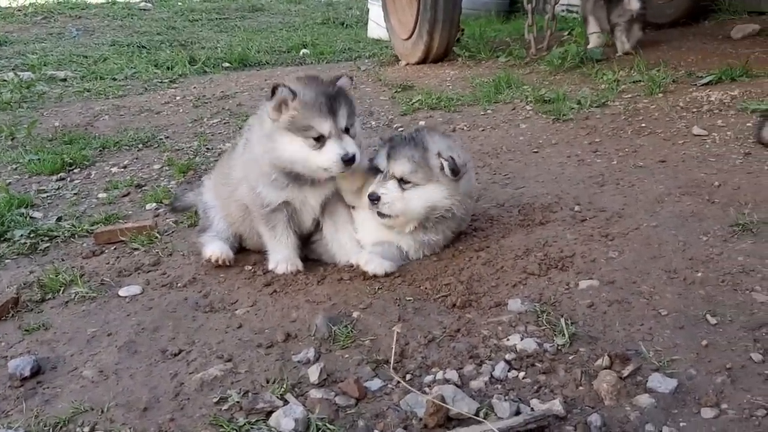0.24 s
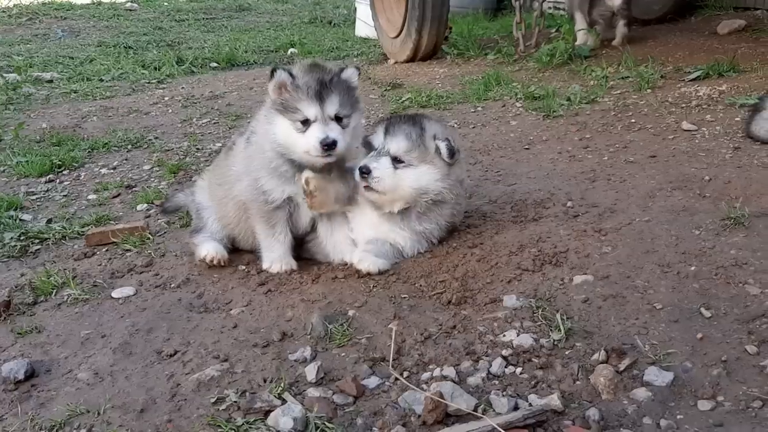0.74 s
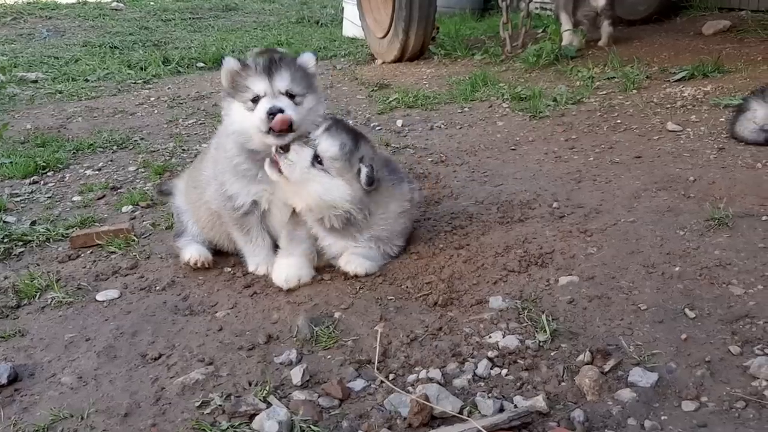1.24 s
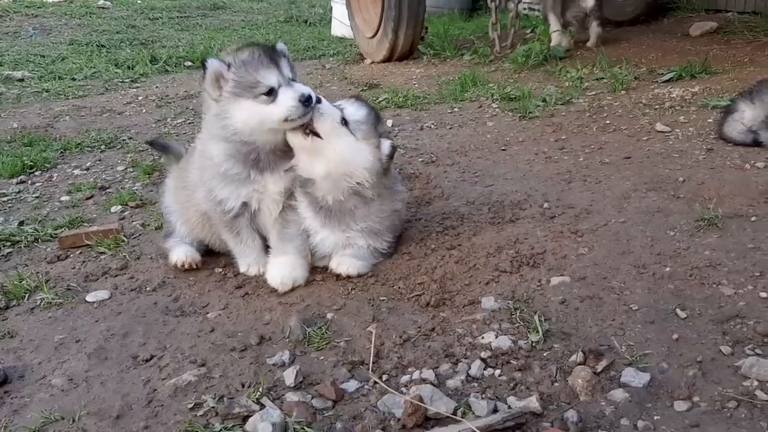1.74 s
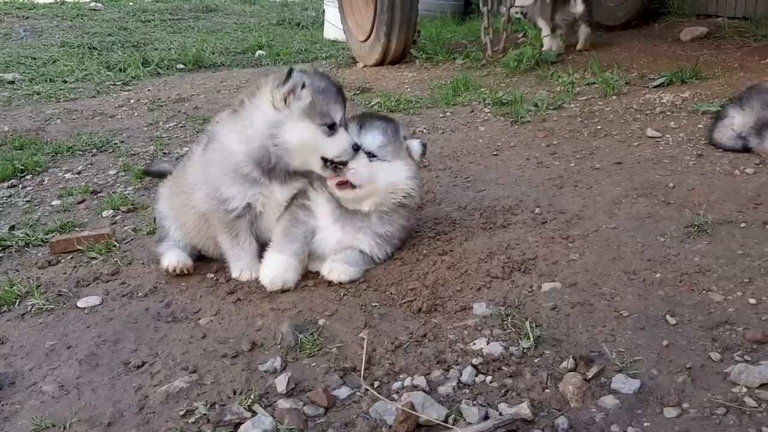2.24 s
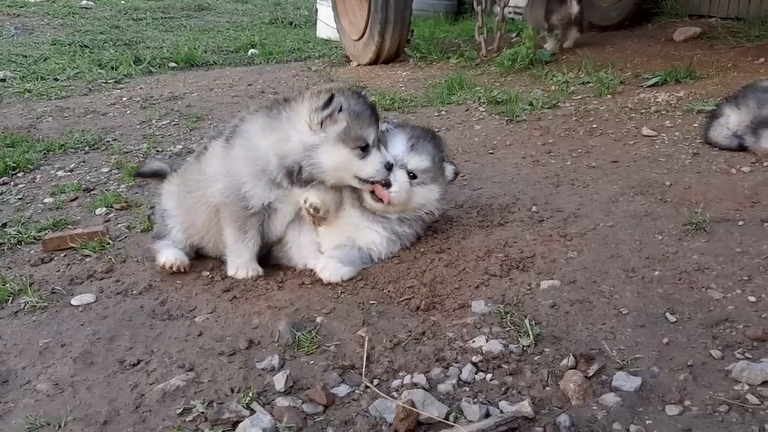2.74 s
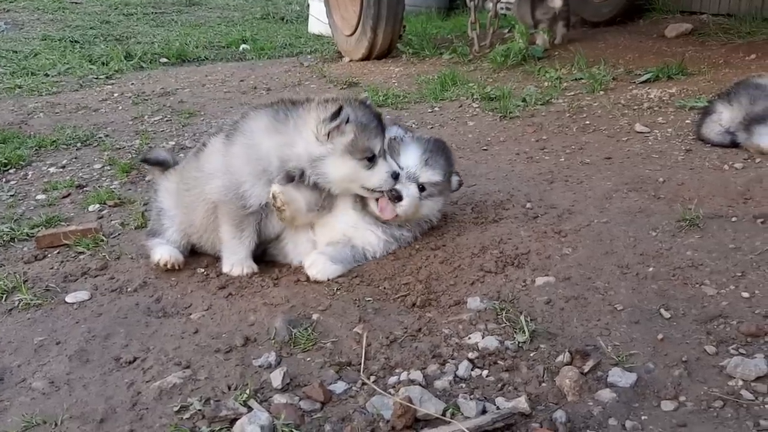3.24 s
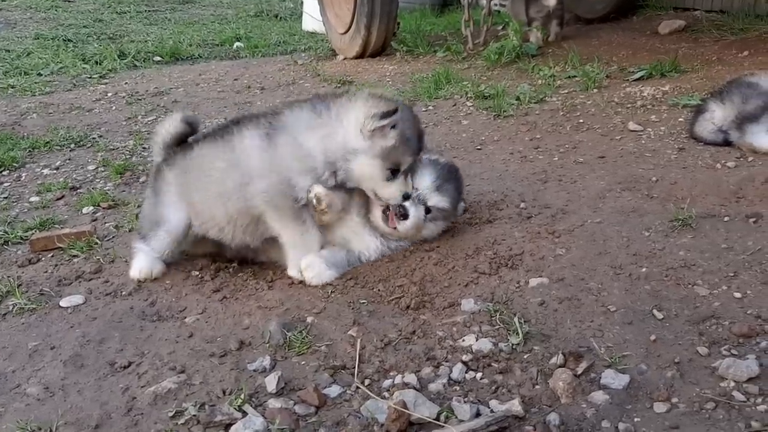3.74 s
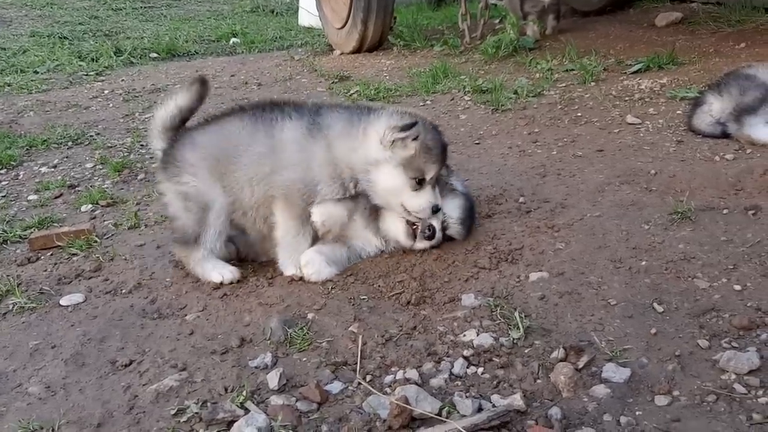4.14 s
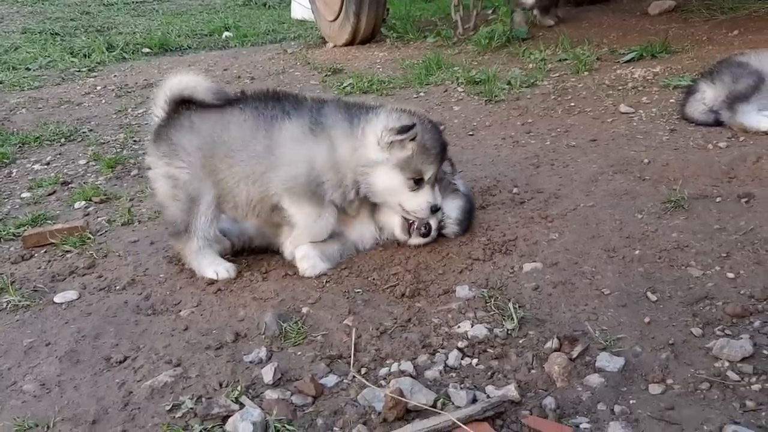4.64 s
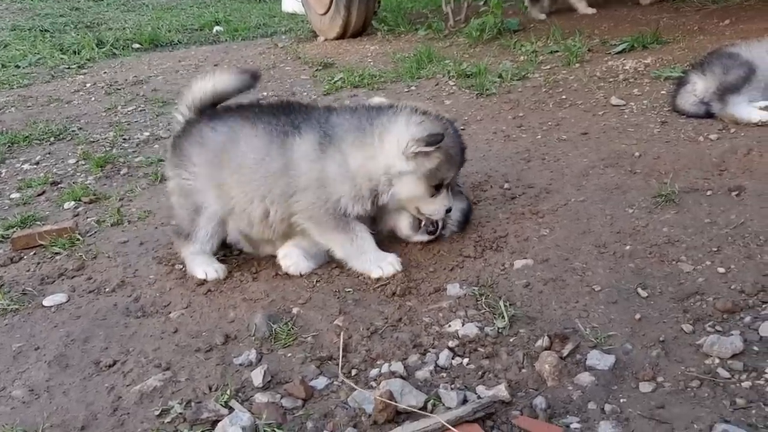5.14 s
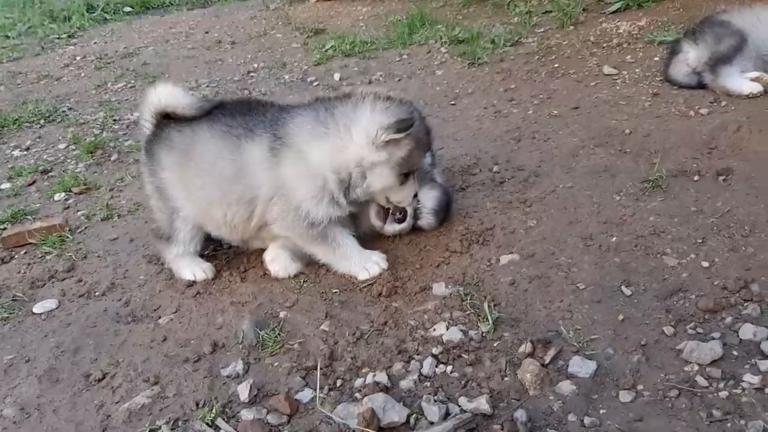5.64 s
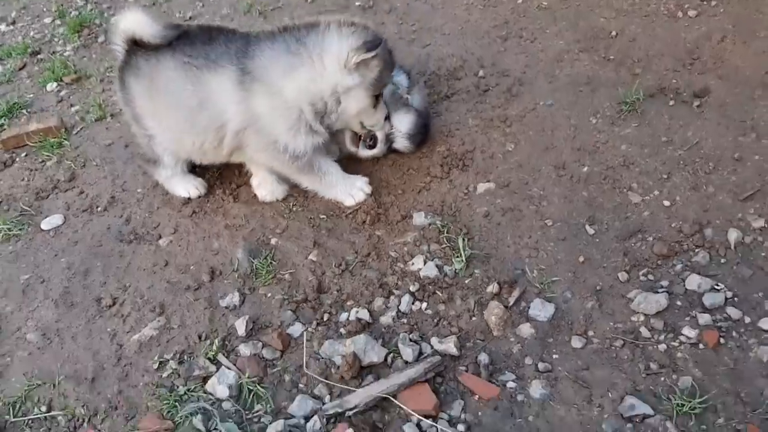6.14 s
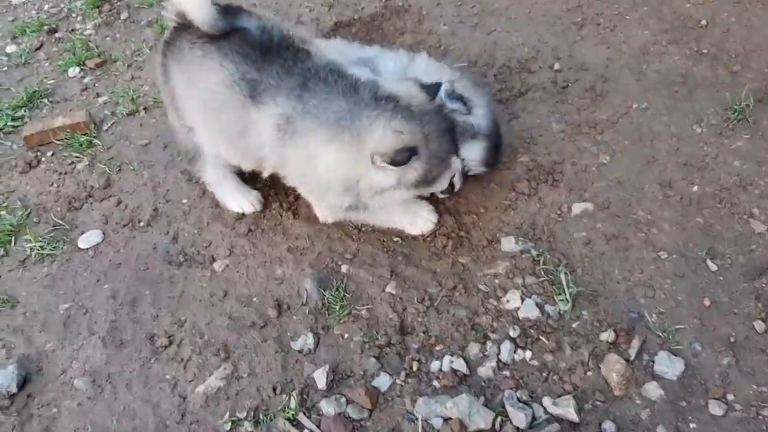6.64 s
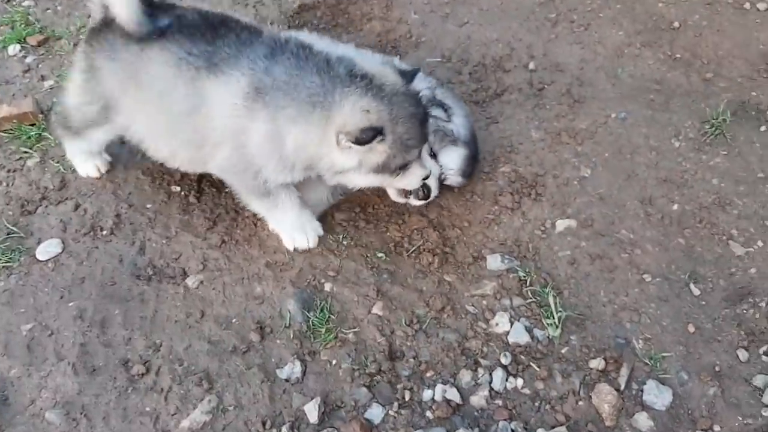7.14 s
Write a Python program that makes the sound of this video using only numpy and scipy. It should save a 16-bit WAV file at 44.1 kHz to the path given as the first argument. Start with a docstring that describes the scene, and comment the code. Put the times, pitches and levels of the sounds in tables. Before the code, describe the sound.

Outdoors, quiet wet puppy smacks and soft scuffling give way to four long, piercing puppy whines amid fur rubbing and gritty dirt.

```python
"""Two puppies wrestle on bare earth in a yard, close to a stereo microphone, over open air (shaped noise).
Wet smacks (ringing ticks) and soft whimpers (arched near-pure tones) open it; noise rubs as fur and dirt.
A body rolls dully, then the pinned puppy whines in four long, high calls (gliding harmonics and breath).
The one on top grumbles (pulsed noise) just before and during the first two; echoes are faint and sparse.
Grit cracks from the middle on, and low bumps (short sines and noise) reach the microphone near the end."""
import sys
import numpy as np
from scipy import signal
from scipy.fft import rfft, irfft, next_fast_len
from scipy.io import wavfile

SR = 44100
rng = np.random.default_rng(int(sys.argv[2]) if len(sys.argv) > 2 else 0)


def file_out(sig):
    """Save sig as 16-bit WAV at sys.argv[1]."""
    # one column per channel
    cols = np.atleast_2d(sig).T
    # limit, then scale
    lim = np.clip(cols, -1, 1)
    pcm = np.round(lim * 32767).astype(np.int16)
    wavfile.write(sys.argv[1], SR, pcm)


N = 325458
TIME = np.arange(N) / SR

# pitch of each whine: t/s, f/Hz
PITCH_1 = [(3.65, 1315), (3.67, 1296), (3.694, 1381), (3.806, 1385), (3.828, 1412), (3.96, 1401),
           (3.992, 1337), (4.044, 1427), (4.062, 1398)]
PITCH_2 = [(4.252, 1235), (4.29, 1335), (4.335, 1378), (4.5, 1342), (4.52, 1357), (4.745, 1320),
           (4.764, 1265), (4.8, 1283), (4.88, 1188), (4.924, 1182), (4.954, 1249), (4.985, 1242),
           (5.045, 1165), (5.15, 1121), (5.35, 1138), (5.496, 1246), (5.562, 1232), (5.602, 1302),
           (5.645, 1306)]
PITCH_3 = [(5.842, 1115), (5.872, 1123), (5.9, 1290), (5.926, 1348), (5.955, 1334), (5.998, 1355),
           (6.038, 1412), (6.065, 1404), (6.12, 1300), (6.214, 1256), (6.3, 1290), (6.63, 1280),
           (6.705, 1318), (6.735, 1298)]
PITCH_4 = [(6.94, 1002), (6.982, 1160), (7.018, 1264), (7.043, 1240), (7.093, 1286), (7.104, 1328),
           (7.154, 1369), (7.25, 1270), (7.376, 1240)]
# strength of each whine as the jaw moves, before trims:
# t/s, fundamental level/dB, 2nd harmonic level/dB, 3rd level/dB, 4th level/dB, higher overtones level/dB
VOICE_1 = [(3.665, -39, -65, -71, -73, -76), (3.733, -36, -61.5, -46, -66, -64),
           (3.841, -29.5, -59, -54.5, -44, -49), (3.933, -21.5, -47.5, -45.5, -68, -52),
           (4.013, -25.5, -38, -33.5, -48.5, -43), (4.075, -22, -75, -54, -68, -44)]
VOICE_2 = [(4.265, -26.5, -63, -74, -72, -67), (4.315, -35, -53.5, -54, -64, -60.5),
           (4.515, -28.5, -62.5, -67, -64, -59.5), (4.559, -36.5, -62, -61, -66, -61),
           (4.675, -31, -72, -65, -65, -58.5), (4.795, -15, -41, -34, -70, -48.5),
           (4.821, -22.5, -22.5, -21, -45.5, -43.5), (4.919, -27.5, -15, -28, -49, -48.5),
           (4.953, -19, -35, -24.5, -51, -49), (5.061, -22.5, -31.5, -53.5, -50.5, -52),
           (5.177, -29.5, -35.5, -51.5, -60, -53.5), (5.251, -25.5, -23.5, -49.5, -37.5, -55),
           (5.329, -24, -27.5, -51.5, -31.5, -54.5), (5.417, -19, -26.5, -48, -42.5, -53.5),
           (5.449, -16, -33, -29, -38.5, -48), (5.589, -20, -35.5, -22.5, -32, -46),
           (5.631, -24, -33, -49, -44, -49), (5.655, -17, -41, -40.5, -47, -41.5)]
VOICE_3 = [(5.855, -27, -46, -57, -46.5, -63), (5.889, -29, -32.5, -22, -32.5, -48),
           (6.045, -19, -34, -21.5, -36.5, -51.5), (6.117, -21.5, -47, -38.5, -44, -48),
           (6.225, -39, -46.5, -33, -49, -49), (6.301, -22.5, -39.5, -33, -35, -52),
           (6.427, -28, -28, -45, -45.5, -55), (6.499, -22, -31, -35, -34.5, -57.5),
           (6.551, -19.5, -31, -44.5, -37, -52), (6.657, -16.5, -32.5, -37, -34.5, -46),
           (6.725, -18.5, -42, -39, -39, -53), (6.745, -20.5, -29, -47, -48, -62)]
VOICE_4 = [(6.943, -35.5, -38, -51, -51, -55), (6.963, -26, -33.5, -25, -45, -47),
           (6.989, -34.5, -32.5, -36.5, -36, -41), (7.067, -29, -37.5, -27.5, -29.5, -40),
           (7.117, -23, -33.5, -22, -29.5, -46), (7.153, -16.5, -41, -21, -36, -57.5),
           (7.265, -24, -40.5, -40, -43, -53), (7.287, -29, -34.5, -33.5, -43, -53.5),
           (7.365, -35, -44, -34, -36.5, -53.5)]
# the four whines: start t/s, end t/s, added roughness at the start, time to clear t/s,
# tilt of the top overtones at the start and at the end [dB per octave]
WHINES = [(3.645, 4.094, 0.4, 0.1, -19, -2.5), (4.253, 5.674, 0.2, 0.18, -17.5, -6.5),
          (5.842, 6.763, .18, 0.07, -18, 15), (6.929, 7.448, 0.43, 0.12, -51.5, -4)]
# the voice cracks and the overtones leap up or down:
# t/s, spread of the roughness t/s, added roughness, leap level/dB before it evens out
CRACKS = [(3.971, 0.0064, 0.87, 19.5), (4.034, 0.015, 0.47, -16.5), (4.752, 0.0056, .35, 15),
          (6.024, 0.0046, 0.1, 8), (6.082, 0.021, 0.2, 2.5), (6.757, 0.014, 0.7, 2),
          (7.103, 0.0077, 0.07, 9.5)]
# where the head's turning puts the fundamental: t/s, left-right level/dB, left lead [rad]
HEAD = [(3.7, 0, 1.5), (3.88, 17, 2.5), (4.02, 2, 1.3), (4.65, -1, 2), (4.75, -0.5, .5), (5.35, 3.5, 0.3),
        (5.52, -.5, 0.8), (6.02, 4.5, 0.4), (6.2, 10, -1.1), (6.7, 4, -0.1), (7.14, 7, 1.06),
        (7.33, 9, -2.5)]
# colour of the high overtones: f/Hz, relative level/dB
OVERTONES = [(5500, 2), (6500, 7), (7400, 12.5), (8600, -6.5), (9800, 14), (11500, 17.5), (13000, 16),
             (14300, 13), (16000, -17)]
# colour of the hoarse breath: f/Hz, relative level/dB per Hz
RASP = [(200, -19), (600, -14.5), (1000, -15), (1400, 10.5), (2300, 13), (3000, -19.5), (3900, 14.5),
        (5200, -38), (6500, -34), (8500, -33.5), (11000, -23), (16000, -29)]
# soft closed-mouth whimpers of either puppy:
# t/s, length t/s, first f/Hz, middle f/Hz, last f/Hz, level/dB before the harmonics' falls, roughness
WHIMPERS = [(0.264, 0.0077, 640, 570, 553, -43.5, 1.3), (0.292, 0.063, 620, 536, 640, -46.5, 0.48),
            (2.629, 0.0453, 894, 822, 775, -44, 0.3), (2.974, 0.067, 658, 578, 663, -34, 0.06),
            (3.301, 0.14, 1060, 1310, 1097, -39, 0.14), (3.45, 0.018, 980, 944, 840, -45, 0.25),
            (4.254, 0.036, 610, 634, 630, -46.5, 0.6), (4.4, 0.086, 630, 706, 636, -57.5, 1.3),
            (4.521, 0.13, 750, 792, 720, -54, 0.5)]
# muffled grumbles of the puppy on top: t/s, length t/s, level/dB, mean pulse rate f/Hz
GRUMBLES = [(3.42, 0.053, -55, 250), (3.803, .1, -53.5, 170), (3.975, 0.2, -57, 75),
            (4.235, 0.093, -51.5, 140), (4.536, 0.084, -53.5, 96)]
# its throat: f/Hz, relative level/dB per Hz
MUZZLE = [(250, -31), (500, -13), (700, -8.5), (1000, -11), (1400, -14), (2000, -3.5), (2600, -15.5),
          (4000, -19.5), (8000, -43)]
# wet smacks of the mouths:
# t/s, onset level/dB before trim, resonance f/Hz, resonance level/dB before a fixed lift, tick t60 t/s
SMACKS = [(0.2105, -31, 4730, 9, 0.021), (0.211, -26.5, 11600, -13.5, 0.025), (.221, -48, 4300, 13, 0.073),
          (0.263, -52, 4130, -11, 0.042), (0.342, -48.5, 4520, -13, 0.012),
          (0.381, -41.5, 2660, -10, 0.046), (0.3904, -26.5, 2650, -12, 0.017),
          (0.398, -36.5, 2750, -2, 0.03), (.541, -52, 2400, 3, 0.035), (0.5475, -30, 2380, -10, 0.045),
          (0.563, -41, 2400, 22, 0.014), (1.504, -56.5, 1490, -13, 0.13), (1.973, -39, 11800, -17.5, 0.032)]
# grit cracking under the paws: same columns as the smacks
GRIT = [(3.2455, -61, 11200, 14, 0.03), (3.6263, -57, 11800, 29, 0.027), (4.326, -42, 1720, 12, 0.017),
        (4.347, -60, 11300, -10, .015), (4.385, -51.5, 11700, 8, 0.044), (5.012, -38.5, 6460, -32, 0.04),
        (5.116, -43.5, 3970, -16, 0.023), (5.78, -44, 1580, -4.5, 0.024), (6.327, -34, 3760, -11, 0.015),
        (6.4752, -27.5, 2570, -1, 0.01), (6.707, -34.5, 6870, -33, 0.012), (6.723, -50, 7400, 8, .015),
        (7.216, -54, 12200, 4, 0.013), (7.253, -51, 12000, 1, 0.02), (7.293, -51, 11200, 8, .02),
        (7.325, -35.5, 12100, -18, 0.0027)]
# the bare tick of either: f/Hz, relative level/dB per Hz
TICK = [(150, 1), (600, -6), (1300, 11.5), (3500, 5.5), (5500, -0.5), (7300, 7.5), (9000, 1), (12000, 2),
        (16000, 5.5)]
# vigour of the tussle, which drives the rubbing fur: t/s, level/dB before trim
TUSSLE = [(0, -72), (2.3, -76), (3.55, -76), (3.72, -62.5), (4.55, -69), (4.9, -60.5), (5.85, -65),
          (7.38, -63.5)]
# single shoves and rolls: middle t/s, half length t/s,
# fur level/dB, loose dirt level/dB, low rumble level/dB, all before trims
SHOVES = [(0.364, 0.077, -64.5, -68, -67), (0.803, 0.026, -87, -69, -62), (1.21, 0.23, -70.5, -69, -63),
          (1.593, 0.046, -72, -67.5, -75), (1.87, 0.081, -68.5, -65.5, -67), (2.018, .05, -78, -63.5, -82),
          (2.47, 0.04, -71.5, -69, -74), (2.715, 0.073, -80, -65, -80), (2.812, 0.038, -67, -66, -57.5),
          (3.192, 0.25, -65, -67.5, -66), (3.416, 0.053, -64.5, -63, -64), (4.008, 0.047, -60, -59, -91),
          (4.35, 0.054, -64, -59, -63), (4.777, .15, -66, -64, -71), (6.43, 0.22, -60, -48, -57.5),
          (6.737, 0.081, -60, -48, -54), (7.084, 0.11, -85, -44, -67)]
# rubbed fur: f/Hz, relative level/dB per Hz
FUR_COLOUR = [(150, -26.5), (400, 1.5), (700, 1.5), (1200, 5.5), (1700, -1.5), (2400, 2), (2750, -6.5),
              (3100, -41), (6000, -44)]
# loose dirt: f/Hz, relative level/dB per Hz
DIRT_COLOUR = [(1500, -17.5), (3200, 7), (4600, 7.5), (6000, 4), (7500, 4), (8600, -19), (11000, 3),
               (14000, -6), (16000, 0)]
# a body rolls heavily on the earth: start t/s, length t/s, level/dB
ROLL = (2.75, 0.27, -58.5)
# its dull colour: f/Hz, relative level/dB per Hz
ROLL_COLOUR = [(100, 2), (230, -5), (340, 0.5), (450, -19), (900, -48)]
# low bumps on the microphone: t/s, level/dB before trim and lean, f/Hz, length t/s
BUMPS = [(6.15, -52, 66.7, 0.046), (6.199, -42.5, 73.6, 0.05), (6.297, -43.5, 240, 0.009),
         (6.369, -44.5, 108, 0.058), (6.438, -49.5, 71, 0.087), (6.561, -54, 68, 0.11),
         (6.709, -32, 292, 0.0021), (6.719, -31.5, 78.5, 0.047), (6.763, -33.5, 121, 0.033),
         (6.775, -37, 77, 0.062), (7.127, -49.5, 70.4, 0.069)]
# echo of the yard: f/Hz, t60 t/s
YARD = [(300, 0.24), (1300, 0.33), (4000, 0.37), (8000, 0.26), (15000, 0.39)]
# the open air: f/Hz, relative level/dB per Hz
AIR = [(25, -8), (50, 1.5), (120, 0.5), (300, -10), (730, -20.5), (1500, -18.5), (2400, -14.5),
       (3200, -33.5), (7500, -43.5), (8600, -49), (11300, -24), (16000, -28.5)]

# every whine swells quickly; at its end the pitch sags, the voice roughens and the sound dies
ATTACK_S, ATTACK_DB = 0.0101, -14.5
SAG_S, SAG_SHARE, SAG_ROUGH, SAG_DB = 0.0269, 0.182, 0.45, -14.5
SAG_OVERTONE_DB = -4  # the top overtones die sooner as the pitch sags
CLEAR_ROUGH = 0.021  # roughness left in the clear voice
# a leap evens out within this time; the fundamental and the top overtones take this share of it
LEAP_S, LEAP_SHARE = 0.033, 0.22
# loose dirt rises more steeply with vigour than fur: its drive when the fur's is CALM_DB, and dB per dB
CALM_DB, DIRT_CALM_DB, DIRT_RISE = -76, -78, 1.5
STROKE_DB = 2.6  # unevenness of the scuffling strokes
RUMBLE_DB, AIR_DB = -71, -64.5  # steady low rumble at the microphone before its swaying; open air
EDGE_HZ = 16100  # upper band limit


def whine(start, end, first_rough, clear_s, first_tilt_db, last_tilt_db, pitch, levels):
    """Tight vocal folds ring near 1.3 kHz; the moving jaw brings out one harmonic after another."""
    t = np.arange(start, end, 1 / SR)
    onset = np.clip(1 - (t - start) / ATTACK_S, 0, 1)
    sag = np.clip(1 - (end - t) / SAG_S, 0, 1)
    hz = curves(pitch, t)[0] * (1 - SAG_SHARE * sag)

    leaps_db = np.outer([LEAP_SHARE, 1, 1, 1, LEAP_SHARE], crack_leap(t))
    *low_db, high_db = curves(levels, t) + ATTACK_DB * onset + SAG_DB * sag ** 2 + leaps_db
    high_db = high_db + SAG_OVERTONE_DB * sag

    rough = CLEAR_ROUGH + first_rough * swell(t, start, clear_s) + SAG_ROUGH * sag
    rough += sum(depth * swell(t, s, length) for s, length, depth, _ in CRACKS)
    jitter = 0.028 * rough * wander(len(t), 210).real + 0.0063 * wander(len(t), 49).real
    turns = np.cumsum(hz * (1 + jitter)) / SR

    left_db, lead = curves(HEAD, t)
    ratio = gain_of(left_db) * np.exp(1j * lead)  # left microphone over right
    left = (ratio - 1) / (ratio + 1)
    voice = partial(turns, gain_of(low_db[0]), rough, shimmer=0.25, spread=0.12, left=left)
    for k, db in enumerate(low_db[1:], 2):
        level = gain_of(db - 0.66 + 2 * wander(len(t), 45).real)
        voice += partial(k * turns, level, rough, shimmer=1.0, spread=0.74, left=0.25)

    tilt_db = np.linspace(first_tilt_db, last_tilt_db, len(t))
    voice += top_overtones(hz, turns, high_db, tilt_db, rough)
    voice += breath(turns, low_db, rough)
    return start, voice * signal.windows.tukey(len(t), 0.003 * SR / len(t))


def crack_leap(t):
    """At a crack the overtones jump in level, then drift back to even."""
    return sum(db / 2 * np.tanh((t - s) / 0.0011) * np.exp(-abs(t - s) / LEAP_S)
               for s, _, _, db in CRACKS)


def top_overtones(hz, turns, level_db, tilt_db, rough):
    """Harmonics 5 to 14 share one level by the voice's colour and tilt, each wavering on its own."""
    orders = np.arange(5, 15)
    overtone_hz = orders[:, None] * hz
    shares = gain_of(read(OVERTONES, overtone_hz) + tilt_db * np.log2(overtone_hz / 10000))
    shares /= np.linalg.norm(shares, axis=0)
    voice = 0
    for k, share in zip(orders, shares):
        waver_db = 4.1 * wander(len(hz), 16).real + 3.65 * wander(len(hz), 40).real
        level = share * gain_of(level_db - 2.5 + waver_db)
        voice = voice + partial(k * turns, level, rough + 0.067, shimmer=0.8, spread=0.67, left=-0.33)
    return voice


def breath(turns, low_db, rough):
    """Air escapes in a puff each cycle, more of it when the voice is hoarse."""
    effort = np.linalg.norm(gain_of(low_db), axis=0)
    puffs = noise(RASP, len(turns), same=0.42) * (1 + .5 * np.cos(2 * np.pi * turns))
    return gain_of(-17.0) * effort * rough * puffs


def partial(turns, level, rough, shimmer=.45, spread=.5, left=.15):
    """One harmonic: it flutters when hoarse, and ground reflections shift it between the microphones."""
    flutter = 1 + shimmer * rough * wander(len(turns), 120)
    side = left + spread * wander(len(turns), 4.7)
    channels = np.array([1 + side, 1 - side])
    return np.sqrt(2) * (level * flutter * np.exp(2j * np.pi * turns) * channels).real


def whimper(s, length, first_hz, middle_hz, last_hz, db, rough):
    """A short arch of pitch through the nose, nearly a pure tone."""
    u = np.linspace(0, 1, int(length * SR))
    arch = np.polyfit([0, .5, 1], [first_hz, middle_hz, last_hz], 2)
    hz = np.polyval(arch, u)
    turns = np.cumsum(hz * (1 + 0.044 * rough * wander(len(u), 150).real)) / SR
    tone = sum(partial(k * turns, gain_of(db + fall_db), rough, shimmer=1.0, spread=0.24, left=0)
               for k, fall_db in enumerate([-5.5, -27.5, -40, -39], 1))
    return s, tone * signal.windows.tukey(len(u), .3)


def grumble(s, length, db, rate):
    """Slack folds let uneven puffs through a muzzle pressed into fur."""
    size = int(length * SR)
    turns = np.cumsum(rate * (1 + .25 * wander(size, 60).real)) / SR
    puffs = evened(0.27 + np.exp(-(turns % 1) / 0.24))
    hiss = noise(MUZZLE, SR // 4, same=0.23)[:, :size]
    return s, gain_of(db) * hiss * puffs * signal.windows.tukey(size, .4)


def snap(s, db, hz, ring_db, t60, left_db=0):
    """A smack or grit crack: a noise tick dies fast and rings one resonance."""
    t = np.arange(SR // 8) / SR
    burst = noise(TICK, len(t), same=0.53) * gain_of(-60 * t / t60) * (1 - np.exp(-t / 0.0001))
    cavity = signal.iirpeak(min(hz, EDGE_HZ), 3.5, SR)
    ring = signal.lfilter(*cavity, signal.lfilter(*cavity, burst))
    sound = burst + gain_of(ring_db + 28.5) * ring
    onset_level = sound[:, :SR // 250].std()  # over the first 4 ms
    return s, gain_of(db - 1.0) * lean(left_db) * sound / onset_level


def scuffle(fur_shove, dirt_shove):
    """Fur rubs in uneven strokes; loose dirt hisses and crackles under it."""
    vigour_db, = curves(TUSSLE, TIME)
    fur_level = np.hypot(gain_of(vigour_db), fur_shove)
    dirt_level = np.hypot(gain_of(DIRT_CALM_DB + DIRT_RISE * (vigour_db - CALM_DB)), dirt_shove)

    fur_strokes = gain_of(4.5 + STROKE_DB * wander(N, 35).real)
    fur = noise(FUR_COLOUR, N, same=0.36) * fur_level * fur_strokes

    # about 130 grains a second, a few far louder than the rest
    grains = (rng.random(N) < 130 / SR) * gain_of(2.8 * np.minimum(rng.exponential(1, N), 4))
    crackle = signal.lfilter([1], [1, -np.exp(-1 / (0.00044 * SR))], grains)
    dirt = noise(DIRT_COLOUR, N, same=0.1) * evened(1 + 0.56 * crackle)
    dirt = dirt * dirt_level * gain_of(-3.0 + STROKE_DB * wander(N, 24).real)
    return fur + dirt * lean(-2.0)


def shoves():
    """Strength of the fur, the dirt and the rumble as each shove swells and fades."""
    return sum(gain_of(levels_db)[:, None] * swell(TIME, s, half) for s, half, *levels_db in SHOVES)


def roll(s, length, db):
    """The dull, uneven drag of a body over packed earth."""
    size = int(length * SR)
    drag = gain_of(db + 2 * wander(size, 20).real)
    return s, drag * noise(ROLL_COLOUR, size, same=0.88) * signal.windows.tukey(size, .3)


def bump(s, db, hz, length):
    """A brief, soft low push with some dull noise, mostly on the left microphone."""
    t = np.arange(int(length * SR)) / SR
    push = np.sin(2 * np.pi * (hz * t + .5 * rng.random((2, 1))))
    dull = [(20, -34), (50, 9.5), (150, 0.5), (500, -25.0), (2000, -42)]
    push = push + 0.47 * noise(dull, SR // 4, same=0.31)[:, :len(t)]
    return s, gain_of(db - 2.0) * lean(18.5) * push * signal.windows.tukey(len(t), .8)


def yard(x):
    """Sparse, faint echoes from walls and ground, each band dying at its own rate."""
    taps = rng.standard_normal((2, SR)) * (rng.random((2, SR)) < 1500 / SR) * (TIME[:SR] > .008)
    hz, t, z = signal.stft(taps, SR, nperseg=256)
    decay = gain_of(-60 * t / read(YARD, hz)[:, None])
    tail = signal.istft(z * decay, SR, nperseg=256)[1]
    tail = tail / np.linalg.norm(tail, axis=1, keepdims=True)
    return signal.fftconvolve(x, tail, axes=1)[:, :N]


def air(shove):
    """Steady outdoor background with a lumpy low rumble that grows with each shove."""
    level = np.hypot(gain_of(RUMBLE_DB), shove)
    low = [(15, -35), (30, -14), (50, -2), (100, 0), (220, -5), (400, -13), (900, -35)]
    rumble = noise(low, N, same=.45)
    background = gain_of(AIR_DB) * noise(AIR, N, same=0.67)
    return background + rumble * level * gain_of(1.5 * wander(N, 9.8).real)


def noise(colour, size, same=.7):
    """Coloured noise at two microphones that share part of it."""
    length = next_fast_len(size)
    tint = gain_of(read(colour, np.fft.rfftfreq(length, 1 / SR)))
    z = irfft(rfft(rng.standard_normal((3, length))) * tint, length)[:, :size]
    same = np.clip(same, 0, 1)
    pair = np.sqrt(same) * z[0] + np.sqrt(1 - same) * z[1:]
    return pair / pair.mean(0).std()


def wander(size, hz):
    """Smooth complex chance, about rms 1, moving mostly below hz."""
    f = np.fft.fftfreq(next_fast_len(max(size, SR)), 1 / SR)
    z = rng.standard_normal((len(f), 2)) @ [1, 1j]
    return evened(np.fft.ifft(z / (1 + (f / hz) ** 4)))[:size]


def swell(t, middle, half_length):
    """A smooth rise and fall of height 1."""
    return np.exp(-((t - middle) / half_length) ** 2)


def lean(db):
    """Gains of the two channels for a left-right difference."""
    return gain_of(np.array([[db], [-db]]) / 2)


def gain_of(db):
    """Decibels to amplitude."""
    return 10 ** (np.asarray(db) / 20)


def evened(x):
    """Scales to rms 1."""
    return x / np.sqrt(np.mean(abs(x) ** 2) + 1e-20)


def read(points, hz):
    """Reads a spectrum on a log-frequency axis."""
    f, value = np.transpose(points)
    return np.interp(np.log(hz + 1), np.log(f + 1), value)


def curves(rows, t):
    """Reads every column of a timed table."""
    s, *columns = np.transpose(rows)
    return [np.interp(t, s, c) for c in columns]


def add(mix, s, sound):
    """Lays a stereo sound into the mix."""
    part = mix[:, round(s * SR):][:, :sound.shape[-1]]
    part += sound[..., :part.shape[-1]]


def scene():
    """The puppies and their echo over the scuffle and the open air."""
    cries, small, bumps = np.zeros((3, 2, N))
    pitches = [PITCH_1, PITCH_2, PITCH_3, PITCH_4]
    voices = [VOICE_1, VOICE_2, VOICE_3, VOICE_4]
    for row, pitch, levels in zip(WHINES, pitches, voices):
        add(cries, *whine(*row, pitch, levels))
    for row in WHIMPERS:
        add(small, *whimper(*row))
    for row in GRUMBLES:
        add(small, *grumble(*row))
    for row in SMACKS:
        add(small, *snap(*row, left_db=1.0))
    for row in GRIT:
        add(small, *snap(*row, left_db=-11.0))
    for row in BUMPS:
        add(bumps, *bump(*row))
    # the cries carry across the yard; sounds near the ground return less
    echo = yard(gain_of(-14) * cries + gain_of(-23.5) * small)
    add(small, *roll(*ROLL))  # added after the echo, so it stays dry
    fur_shove, dirt_shove, rumble_shove = shoves()
    return cries + small + echo + scuffle(fur_shove, dirt_shove) + air(rumble_shove) + bumps


def record(dry):
    """The recorder's band limit: a steep low-pass."""
    low_pass = signal.firwin(401, EDGE_HZ, window=("kaiser", 9), fs=SR)
    return signal.oaconvolve(dry, low_pass[None], "same", axes=1)


dry = scene()
out = record(dry)
file_out(out)
```